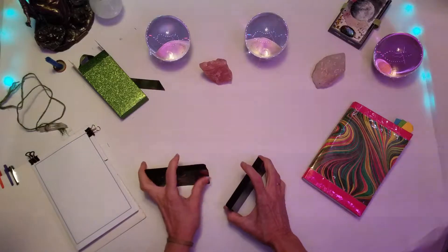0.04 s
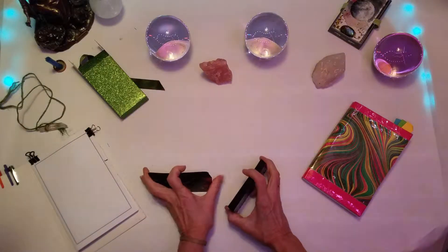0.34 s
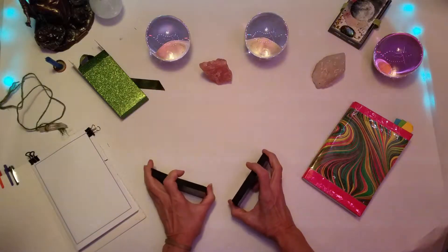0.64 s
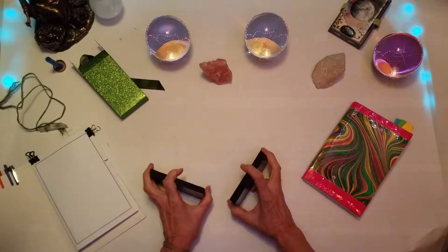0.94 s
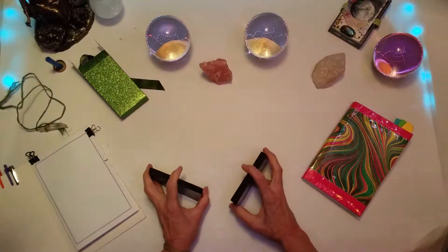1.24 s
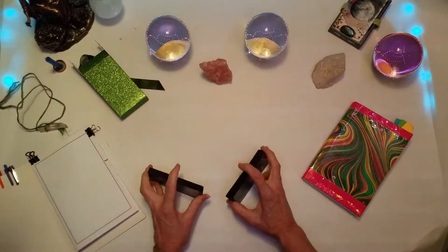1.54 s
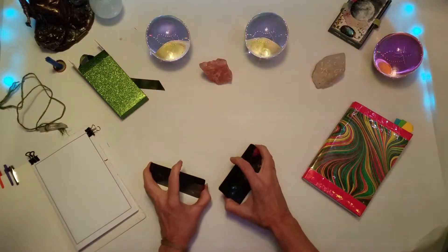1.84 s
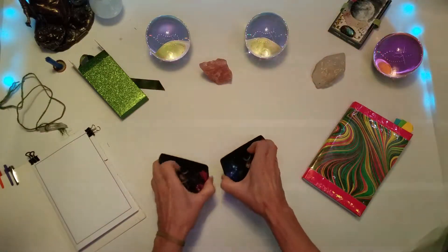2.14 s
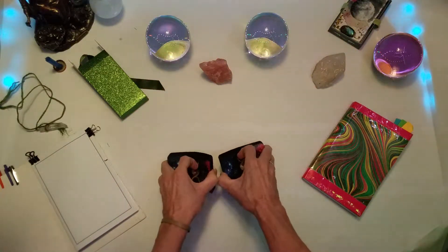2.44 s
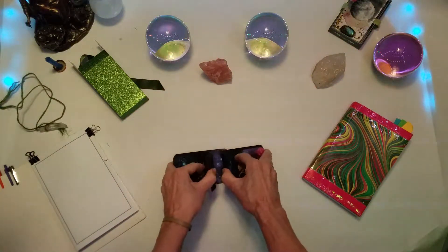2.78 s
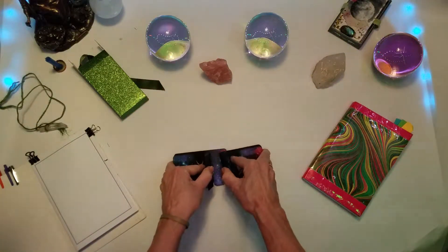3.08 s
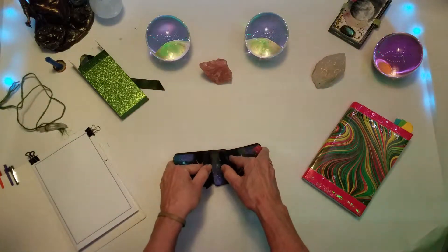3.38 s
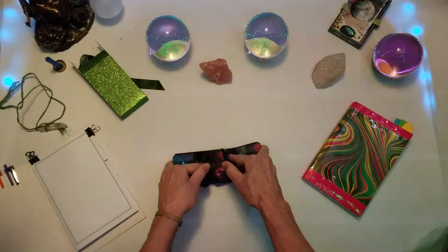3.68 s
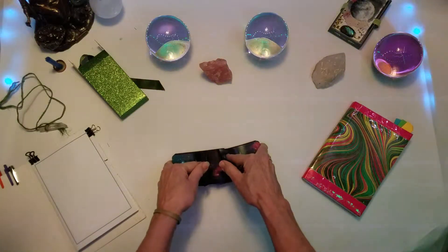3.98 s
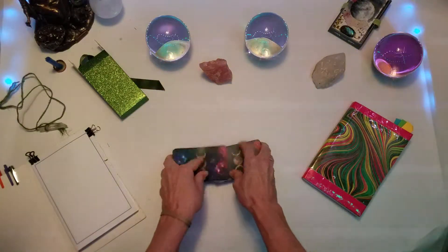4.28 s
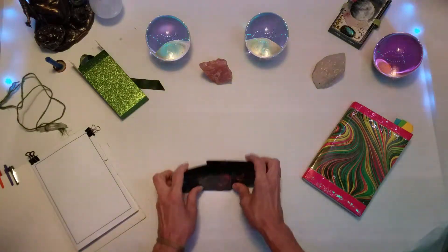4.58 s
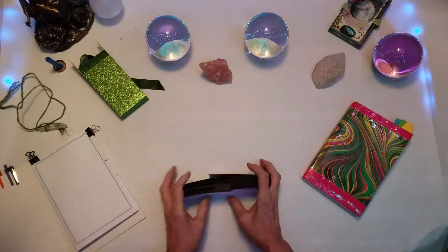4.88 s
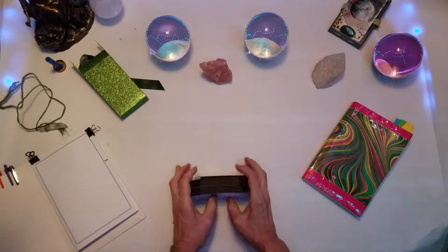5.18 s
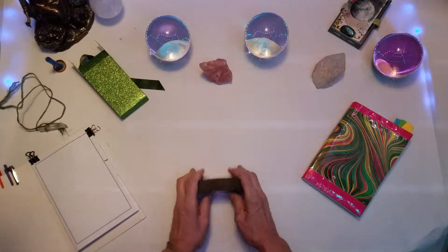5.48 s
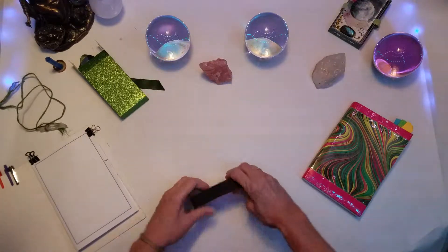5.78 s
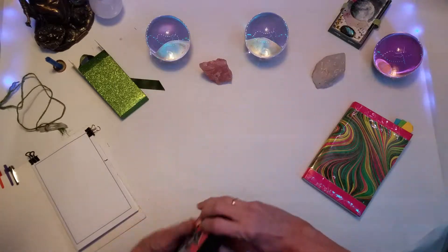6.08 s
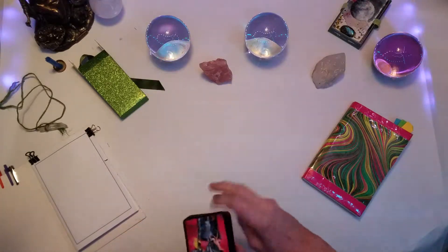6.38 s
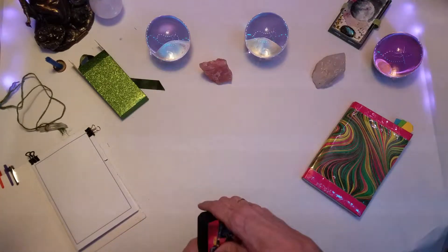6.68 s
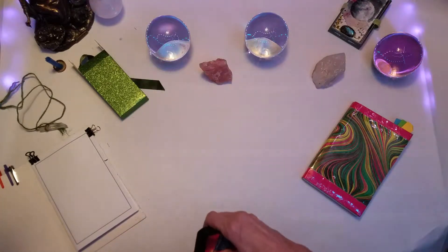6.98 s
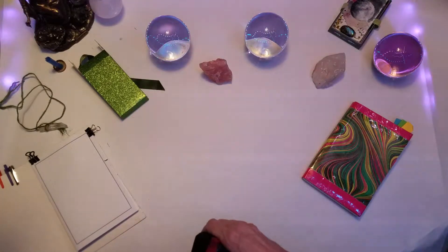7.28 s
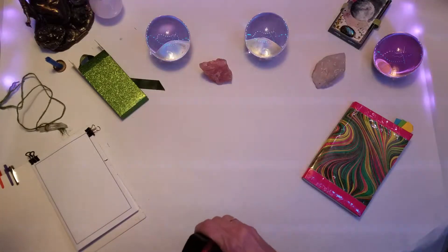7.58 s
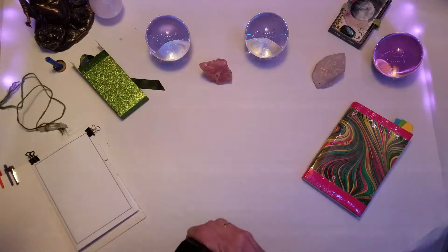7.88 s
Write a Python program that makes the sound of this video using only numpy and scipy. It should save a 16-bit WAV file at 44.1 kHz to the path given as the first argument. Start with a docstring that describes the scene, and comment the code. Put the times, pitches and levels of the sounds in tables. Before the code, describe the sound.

A deck of cards is knocked square, riffle shuffled on a table, bridged and tapped together in a quiet room.

```python
"""Tarot riffle shuffle

A deck is shuffled on a covered table in a small, quiet room. One half is knocked square, then the cards
snap off the thumbs in uneven clumps over a papery rustle, with a few soft table booms near the end.
They flap down out of the bridge, and the halves are slid together, tapped and picked up with a few
dry clicks. Underneath sits a faint bed of room air, mains hum and microphone hiss."""
import sys
import numpy as np
from scipy import signal
from scipy.fft import rfft, irfft, next_fast_len
from scipy.io import wavfile
from scipy.ndimage import map_coordinates

SR = 44100
rng = np.random.default_rng(int(sys.argv[2]) if len(sys.argv) > 2 else 0)


def master(y):
    """Save y as 16-bit WAV."""
    cut = np.clip(np.atleast_2d(y).T, -1, 1)
    pcm = np.round(cut * 32767)  # scale
    wavfile.write(sys.argv[1], SR, pcm.astype(np.int16))


N = 349713

# clumps snapping off the thumbs: t/s, level/dB, landing weight/dB, edge brightness/dB
SNAPS = [(2.656, -6, 3, -6.5), (2.6774, 1.5, -16, -4), (2.6911, 1.5, 2.5, -5.5), (2.795, -8.5, 7.5, 2),
         (2.8084, -4, -2, -8.5), (2.8687, 2.5, -5, 10), (2.9211, -6, -0.5, -3), (2.9651, -6.5, -1, -1),
         (2.9847, -7, 0, -8), (3.0179, -9.5, 7, -4.5), (3.0399, -5.5, 1, -4), (3.055, -6.5, 3, -3),
         (3.0916, 5, 3, -7), (3.1296, -4, -7, 2), (3.194, -12.5, 9, -10), (3.2423, -6, 11, -3.5),
         (3.2623, 1.5, 6, -6.5), (3.3014, 8.5, -8, 5), (3.3686, 7, -12.5, 4.5), (3.3726, 7, -7, -10),
         (3.4368, -9, 4, 0), (3.4985, -8, 14, -5), (3.5099, 8.5, -2, -4.5), (3.5652, 6, 7, -12),
         (3.6825, -8.5, 11, -5.5), (3.701, -11.5, 11.5, -17), (3.7418, -7, 6, -11), (3.7625, -10, 9.5, -1),
         (3.7742, -6, 7.5, -6.5), (3.822, 10.5, -4.5, 4), (3.897, -2, 7, 0.5), (3.9153, 0.5, 4.5, -5),
         (3.956, -7, 2.5, -2), (3.9818, -2, 6, -9.5), (4.0197, 9, -8.5, 9), (4.045, 1.5, 10.5, -1.5),
         (4.069, 0, -5.5, 1.5), (4.0879, -6, -2.5, -4), (4.119, 0, -12.5, -6)]
# flow of cards off the bent packs: t/s, level/dB
CARD_FLOW = [(2.62, -53.5), (2.76, -54), (2.95, -49.5), (3.06, -46.5), (3.17, -57), (3.24, -44),
             (3.412, -44), (3.47, -50.5), (3.539, -37.5), (3.63, -44.5), (3.79, -34.5), (3.871, -48),
             (3.93, -31), (4.06, -33), (4.12, -39), (4.17, -52)]
# card corners scraping the thumbnail: t/s, level/dB
FLICKS = [(2.797, -35.5), (3.093, -41), (3.1295, -38), (3.2622, -28), (3.496, -32.5), (3.775, -37),
          (3.893, -29.5), (3.915, -30.5)]
# low booms of the table top: t/s, level/dB, f/Hz
BOOMS = [(3.565, -38.5, 109), (3.984, -37.5, 93), (4.017, -42, 93), (4.05, -37, 112), (4.097, -36.5, 112.6)]
# clumps falling out of the bridge: t/s, level/dB, scrape time/s
FLAPS = [(4.544, -6, 0.0054), (4.5599, 2.5, 0.0055), (4.582, -7.5, 0.00074), (4.621, -8.5, 0.0048),
         (4.662, -5, 0.0039), (4.675, -4, 0.0029), (4.6992, -7, 0.0016), (4.786, -18.5, .003)]
# a pack bumping the table: t/s, level/dB, bass/dB, edge brightness/dB, scrape time/s
KNOCKS = [(0.589, 9.5, -6.5, -6, 0.0012), (1.065, -20.5, 2, 12, 0.025), (2.141, -26, 7, 5, 0.0023),
          (4.273, -19, -6, 17, 0.022), (5.194, -28.5, 7.5, 8, 0.0041), (5.245, -14, 0.5, 20, 0.0024)]
# card edges clicking in the hand: t/s, level/dB, weight/dB, edge brightness/dB
CLICKS = [(5.5524, -27.5, 5.5, 4), (6.2376, -30, 18, 0), (6.9302, -22.5, -11, -2.5), (7.3862, -15, -16, -8)]
# sliding strokes: t/s, length/s, table rub/dB, card rub/dB
STROKES = [(0.044, 0.19, -48, -69), (0.489, 0.076, -51, -81), (2.076, 0.28, -55, -68),
           (4.59, 0.1, -48.5, -87), (4.84, 0.13, -51.5, -61), (5.182, 0.076, -49.5, -64),
           (5.302, 0.26, -57.5, -70.5), (6.3, 0.686, -62, -78.5)]

# tone curves: f/Hz, relative level/dB
CARD_EQ = [(40, -30.5), (100, -12.5), (300, -1.5), (700, 3), (1300, 2), (2200, 1), (2800, -6), (3700, -10),
           (4500, -18), (5500, -25.5), (7000, -41), (8800, -46.5), (11300, -35.5), (16000, -48)]  # a card's snap
RUSTLE_EQ = [(60, -19.5), (180, 8.5), (400, 0.5), (900, 9.5), (2000, 2), (3700, -10.5), (5500, -22),
             (8000, -46), (11500, -27), (16000, -25)]  # running cards
ZIP_EQ = [(1000, -50), (6000, -22), (9000, -14), (11500, 0), (16000, -5)]  # a grazing corner
PACK_EQ = [(40, -30), (100, -7), (200, 0), (450, 0), (750, -1.5), (1100, -7.5), (1600, -11.5),
           (2700, -26.5), (3800, -41), (6000, -70), (16000, -68)]  # a pack's dull landing
TABLE_RUB_EQ = [(60, -19), (200, -4), (420, -5), (900, -9.5), (1600, -18.5), (3000, -32), (8000, -63)]  # pack on table
CARD_RUB_EQ = [(200, -15), (900, 1), (1800, 6.5), (2600, 5), (3500, -4), (5000, -13), (7500, -27.5),
               (12000, -19), (16000, -25.5)]  # card on card
AIR_EQ = [(22, -25.5), (40, -20), (62, -7.5), (120, -3), (200, -6.5), (260, -12.5), (400, -12.5),
          (480, -14.5), (600, -15), (880, -15.5), (1400, -25), (2500, -32.5), (5000, -43), (9000, -56.5)]  # room air
HISS_EQ = [(2000, -11.5), (9000, -10.5), (10500, -8.5), (12500, -3), (16000, -1.5)]  # microphone hiss

# resonances: f/Hz, width/Hz, boost or cut/dB
BODY_MODES = [(111.3, 27, 14.5), (147, 22, -11.5), (192, 26, 3), (229.7, 21.4, -10.5), (439.4, 21, 5),
              (527, 21, 6.5), (588, 20, -4), (803, 66, 2.5), (1223, 18.4, 2.5), (1950, 370, -5),
              (2370, 100, -1), (2700, 560, -4.5), (3254, 1200, 2.5), (4430, 310, -4)]  # table and deck
THUD_MODES = [(302, 133, 6.5), (462, 67, 4), (583, 30, -14.5), (674, 64, 10), (1330, 75, -0.5),
              (1790, 80, 9), (2700, 84, 8)]  # a squared pack striking the table
# tones of the mains hum: f/Hz, level/dB
HUM_TONES = [(119, -60.5), (484.5, -70.5), (1227, -78)]
# the room's decay: f/Hz, t60/s
ROOM_DECAY = [(100, 0.17), (260, 0.25), (700, 0.089), (1800, 0.096), (5000, .095), (13000, 0.079)]


def clumps(thick_db=1.5, lead_s=.0095, trail_s=.0037, scatter=.4):
    """Clumps snap off the thumbs; a thick one sheds a faint card just ahead and another just behind."""
    thick = [row for row in SNAPS if row[1] > thick_db]
    early, late = 1 + scatter * rng.uniform(-1, 1, (len(SNAPS), 2)).T
    ahead = [(s - lead_s * stretch, db - 20, weight_db, -2.5)
             for (s, db, weight_db, _), stretch in zip(thick, early)]
    behind = [(s + trail_s * stretch, db - 7, weight_db, edge_db)
              for (s, db, weight_db, edge_db), stretch in zip(thick, late)]
    return card_snaps(SNAPS + ahead + behind)


def card_snaps(snaps, scrape_s=.0011, slap_share=.16):
    """Card edges spring free and land; the heavier the landing, the fuller the low-mid slap."""
    rows = [(s, db, scrape_s, weight_db, slap_share * weight_db, edge_db)
            for s, db, weight_db, edge_db in snaps]
    return amp(-1) * contacts(rows, CARD_EQ, BODY_MODES, bands_hz=[330, 850, 1900, 4200, 7500],
                              scrape_db=-8, room_db=-2.5, punch=.56, fizz_share=.98, flex_hz=2360)


def single_cards(ticks_per_s=45, spread_db=2, weight_db=8.5, edge_db=-5):
    """Single cards tick unevenly past the thumbs; a fast flow blurs into a papery rustle."""
    s, levels = np.transpose(CARD_FLOW)
    flow_db = lambda t: np.interp(t, s, levels, left=-120, right=-120)
    rustle = amp(flow_db(np.arange(N) / SR)) * friction(RUSTLE_EQ, 290, spread_db=2.5, smooth_db=-13.5)
    beats = np.arange(s[0], s[-1], 1 / ticks_per_s)
    late, loud, bright = rng.uniform(-1.1, 1, (len(beats), 3)).T
    times = np.clip(beats + .5 * late / ticks_per_s, s[0], s[-1])
    ticks = [(t, flow_db(t) + 23.5 + accent_db, weight_db, edge_db + bite_db)
             for t, accent_db, bite_db in zip(times, spread_db * loud, spread_db * bright)]
    return card_snaps(ticks) + amp(-7) * rustle


def corner_flicks(scrape_s=.0012):
    """Now and then a card's corner scrapes past the thumbnail with a thin, high zip."""
    rows = [(s, db, scrape_s, 0) for s, db in FLICKS]
    return contacts(rows, ZIP_EQ, BODY_MODES, bands_hz=[2000, 4000, 10000],
                    scrape_db=-4, room_db=-7, punch=.1, fizz_share=0)


def table_top(t60_s=.23, attack_s=.0088):
    """The table top's lowest modes give a few short, soft booms near the end of the riffle."""
    t, out = np.arange(SR // 2) / SR, np.zeros(N)
    for s, db, hz in BOOMS:
        envelope = amp(db - 60 * t / t60_s) * (1 - np.exp(-t / attack_s))
        out[round(s * SR):][:len(t)] += envelope * np.sin(2 * np.pi * hz * t)
    return out


def bridge(bass_db=-6.5, edge_db=3.5):
    """The arched, interleaved cards fall flat in soft flaps."""
    rows = [(s, db, scrape_s, bass_db, edge_db) for s, db, scrape_s in FLAPS]
    return amp(.5) * contacts(rows, PACK_EQ, BODY_MODES + THUD_MODES, bands_hz=[400, 1400, 3800, 9000],
                              scrape_db=-2.5, room_db=-5.5, punch=3.8, fizz_share=.6)


def pack_knocks(rock_s=.0053, loss_db=1.86, bass_step_db=3):
    """A pack thuds on the table and rocks to rest: three quick contacts, each weaker and duller."""
    rows = [(s + k * rock_s, db - loss_db * k ** 2, scrape_s, bass_db + k * bass_step_db, edge_db)
            for s, db, bass_db, edge_db, scrape_s in KNOCKS for k in range(3)]
    return contacts(rows, PACK_EQ, BODY_MODES + THUD_MODES, bands_hz=[500, 1400, 3800, 9000],
                    scrape_db=-10, room_db=-5, punch=.35, fizz_share=.6)


def grip_clicks():
    """Card edges click as the deck is gripped and turned."""
    return card_snaps(CLICKS, scrape_s=.003)


def sliding(rise_share=.46, release_s=.035):
    """Strokes swell, hold and fade: packs drag dully over the table, card faces hiss over each other."""
    t, drag, hiss = np.arange(N) / SR, np.zeros(N), np.zeros(N)
    for s, length, table_db, card_db in STROKES:
        swell = np.clip((t - s) / (rise_share * length), 0, 1)
        stroke = swell * np.exp(-np.maximum(t - s - length, 0) / release_s)
        drag += amp(table_db) * stroke
        hiss += amp(card_db) * stroke
    table = drag * friction(TABLE_RUB_EQ, 270, spread_db=1.5, smooth_db=3)
    faces = hiss * friction(CARD_RUB_EQ, 380, spread_db=6.5, smooth_db=3)
    pressure_db = 1.5 * wobble(25)
    return amp(2.5 + pressure_db) * (table + faces)


def contacts(rows, eq, modes, bands_hz, scrape_db, room_db, punch, fizz_share, flex_hz=None):
    """Each hit is a brief scrape around one sharp push, coloured by the cards and answered by the room."""
    size, lead = 8192, SR // 50
    hz, t = np.fft.rfftfreq(size, 1 / SR), (np.arange(size) - lead) / SR
    colour = unit(amp(along(eq, hz) + peaks_db(modes, hz)))
    tails, grits = room_tails(len(rows), size), rng.standard_normal((len(rows), size))
    detunes = np.exp(.08 * rng.standard_normal(len(rows)))
    out = np.zeros(N + 2 * size)
    for (s, db, scrape_s, *low_db, edge_db), detune, tail, grit in zip(rows, detunes, tails, grits):
        direct = amp(scrape_db) * grit * np.exp(-np.abs(t) / scrape_s)
        direct[lead] += amp(punch * db)  # harder hits are more abrupt
        force = direct / np.linalg.norm(direct) + amp(room_db) * np.roll(tail, lead)
        fizz_db = fizz_share * min(edge_db, 7)  # the top band only partly follows the edge
        tilt = amp(along(list(zip(bands_hz, [*low_db, 0, edge_db, fizz_db])), hz))
        ring = 1
        if flex_hz:  # a shorter free length of card snaps brighter and rings higher: 12 dB an octave
            ring_hz = flex_hz * detune * 2 ** (edge_db / 12)
            ring = amp(peaks_db([(ring_hz, .14 * ring_hz, 2.5)], hz))
        body = rfft(force) * causal(colour * ring)
        hit = irfft(body * causal(tilt)) / np.linalg.norm(irfft(body))
        out[round(s * SR) - lead:][:size] += amp(db) * hit
    return out[:N]


def friction(eq, slips_per_s, spread_db, smooth_db):
    """Tiny random slips over a smooth rub, with the room around them; rms 1."""
    slips = (rng.random(N) < slips_per_s / SR) * rng.choice([-1, 1], N)
    strength = amp(spread_db * np.clip(rng.standard_normal(N), -2, 2))
    force = unit(slips * strength) + amp(smooth_db) * rng.standard_normal(N)
    room = signal.fftconvolve(force, room_tails(count=1, size=8192)[0])[:N]
    return unit(filtered(force + room, lambda hz: amp(along(eq, hz) + peaks_db(BODY_MODES, hz))))


def room_tails(count, size):
    """Short, diffuse reverb tails, each of energy 1; the lows linger longest."""
    hz, t, noise = signal.stft(rng.standard_normal((count, size)), SR, nperseg=256)
    decay = amp(-60 * t / along(ROOM_DECAY, hz)[:, None])
    tails = signal.istft(noise * decay, SR, nperseg=256)[1][:, :size]
    return tails / np.linalg.norm(tails, axis=1, keepdims=True)


def background(air_db=-55.5, hiss_db=-75):
    """The bed: room air, microphone hiss and a slightly wavering mains hum."""
    t, hum = np.arange(N) / SR, np.zeros(N)
    air = unit(filtered(rng.standard_normal(N), lambda hz: amp(along(AIR_EQ, hz))))
    hiss = unit(filtered(rng.standard_normal(N), lambda hz: amp(along(HISS_EQ, hz))))
    for hz, db in HUM_TONES:
        level = np.sqrt(2) * amp(db + 1.7 * wobble(14))
        hum += level * np.sin(2 * np.pi * hz * t + 1.14 * wobble(6.5))
    return amp(air_db) * air + amp(hiss_db) * hiss + hum


def amp(db):
    """Decibels to gain."""
    return 10 ** (np.asarray(db) / 20)


def unit(x):
    """Scale to rms 1."""
    return x / np.sqrt(np.mean(x ** 2) + 1e-20)


def along(points, hz):
    """Read a curve of (f/Hz, value) points on a log frequency axis."""
    f, values = np.transpose(points)
    return np.interp(np.log(hz + 1), np.log(f), values)


def peaks_db(modes, hz):
    """Peaks and dips of a resonant object."""
    return sum(db / (1 + (2 * (hz - centre) / width) ** 2) for centre, width, db in modes)


def wobble(knots_per_s):
    """A smooth random modulator."""
    knots = rng.standard_normal(int(N * knots_per_s / SR) + 4)
    return map_coordinates(knots, [np.arange(N) * knots_per_s / SR])


def filtered(x, response):
    """Equalise x with a gain given as a function of frequency."""
    size = next_fast_len(N + SR // 2)
    return irfft(rfft(x, size) * response(np.fft.rfftfreq(size, 1 / SR)), size)[:N]


def causal(gain):
    """The minimum-phase response with this gain: it rings only after the hit."""
    cepstrum = irfft(np.log(np.maximum(gain, 1e-6)))
    half = len(cepstrum) // 2
    cepstrum[1:half] *= 2
    cepstrum[half + 1:] = 0
    return np.exp(rfft(cepstrum))


def scene():
    """Handling, bed and riffle in one mono mix."""
    handling = pack_knocks() + bridge() + grip_clicks() + sliding()
    bed = background()
    riffle = clumps() + corner_flicks() + table_top() + single_cards()
    return (handling + bed + riffle)[None]


def record(dry, top_hz=16000):
    """A brick-wall high cut on the mix."""
    return filtered(dry[0], lambda hz: hz < top_hz)[None]


dry = scene()
out = record(dry)
master(out)
```